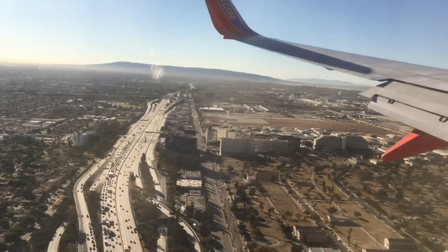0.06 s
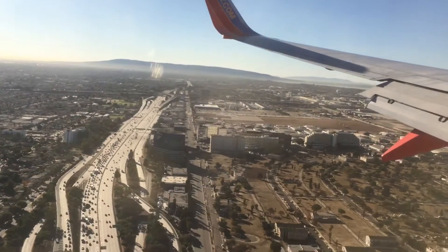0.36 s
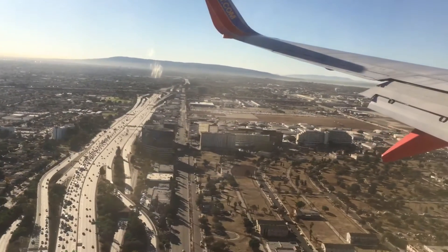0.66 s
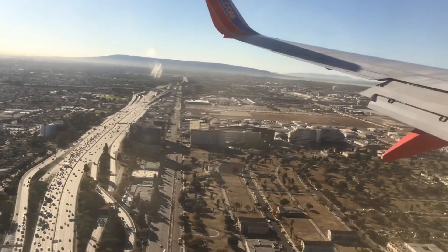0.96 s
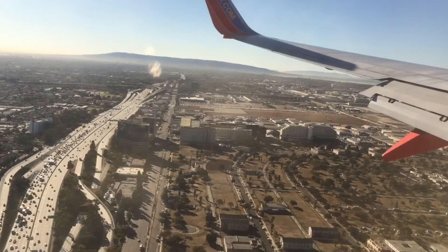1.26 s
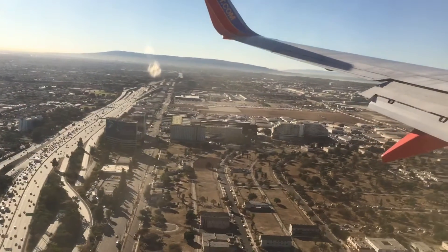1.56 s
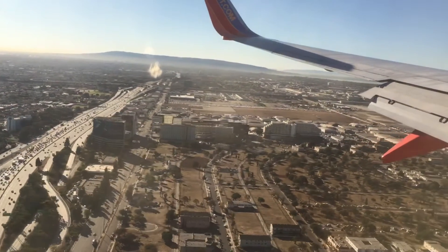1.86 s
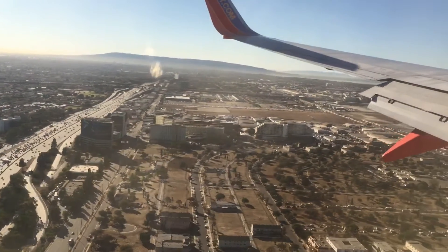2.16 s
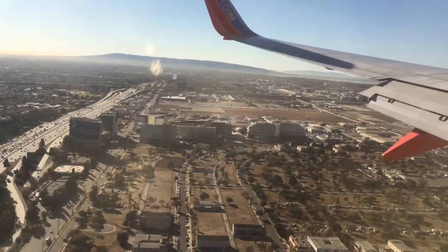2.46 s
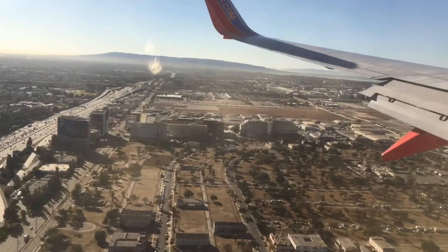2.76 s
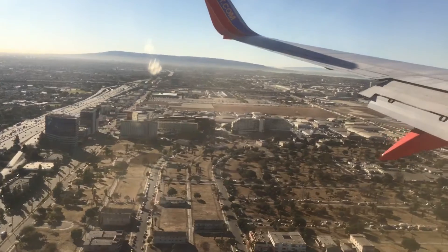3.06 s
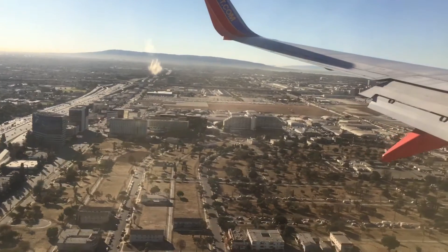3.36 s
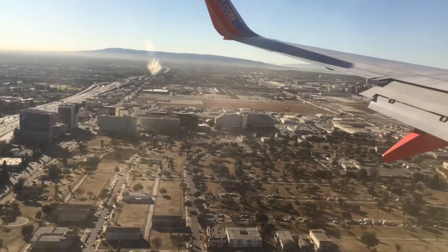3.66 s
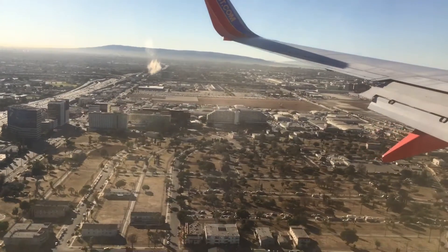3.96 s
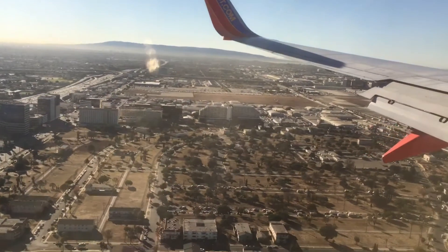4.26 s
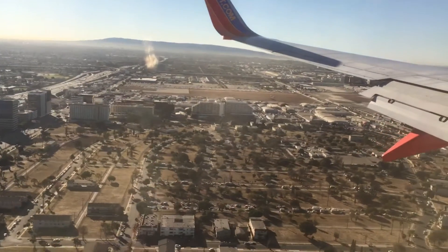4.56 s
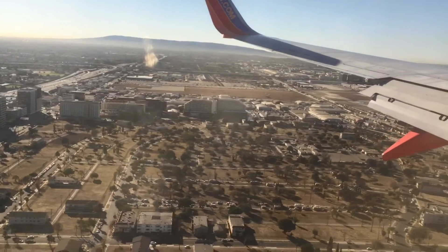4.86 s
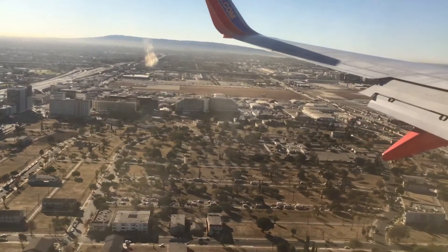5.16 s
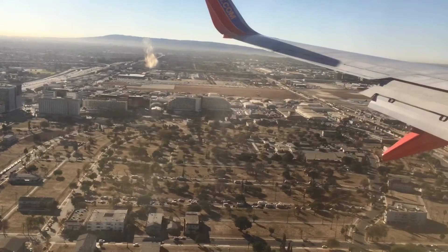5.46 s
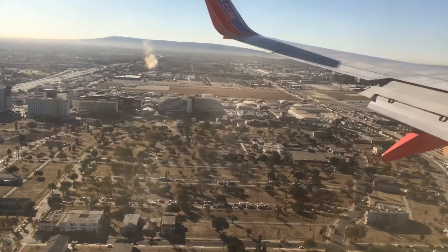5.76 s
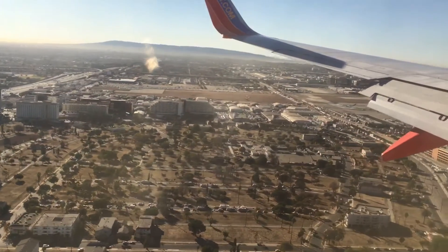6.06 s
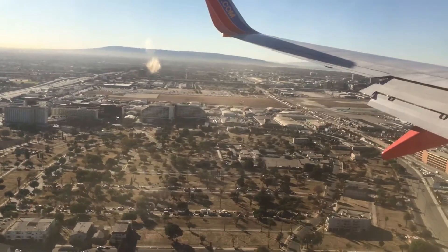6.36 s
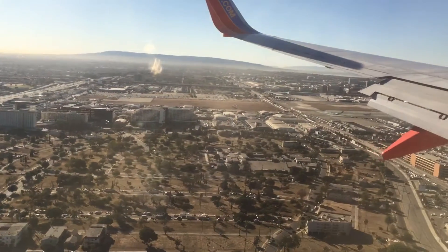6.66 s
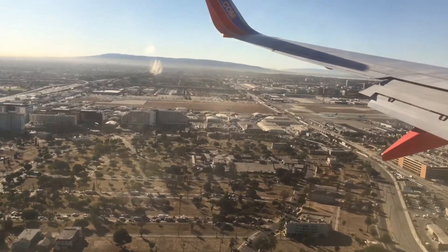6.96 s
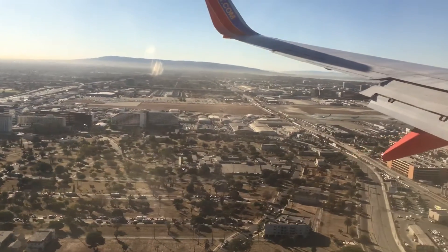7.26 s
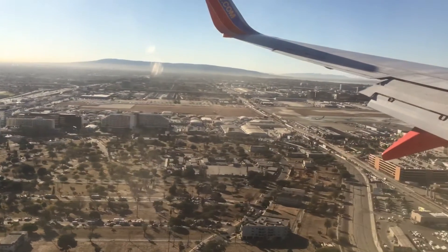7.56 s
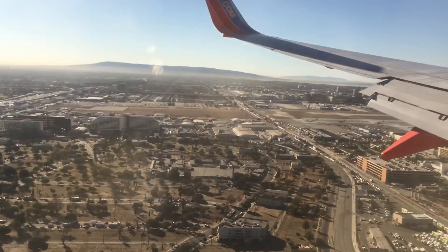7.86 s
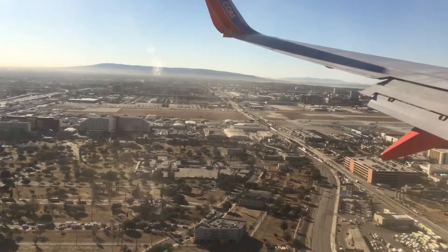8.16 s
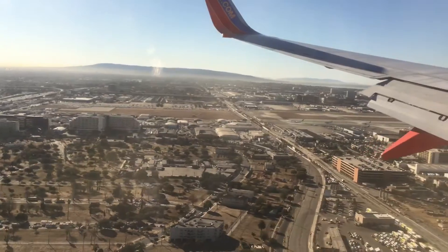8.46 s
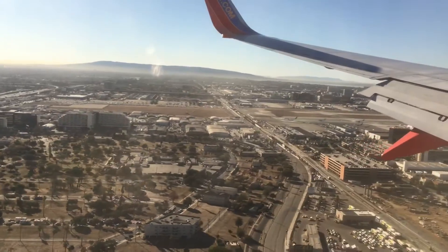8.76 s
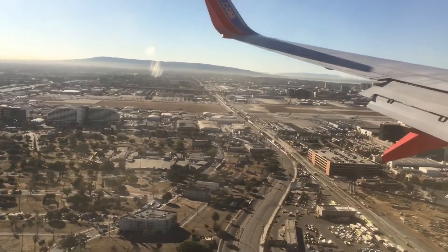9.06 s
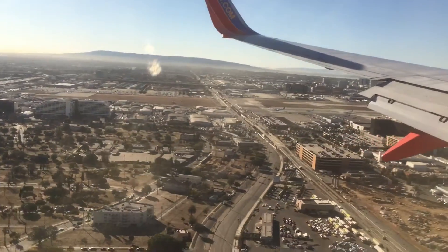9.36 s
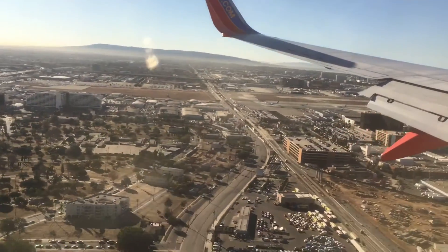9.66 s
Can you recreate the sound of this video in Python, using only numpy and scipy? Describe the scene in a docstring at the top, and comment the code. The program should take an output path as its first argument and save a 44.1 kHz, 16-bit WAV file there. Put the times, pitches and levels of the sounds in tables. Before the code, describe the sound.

Steady low rumble of jet engines and rushing air, heard inside the cabin of a descending airliner.

```python
"""Engine rumble fills the cabin of a descending airliner, heard at a window seat by the wing.
Buffeting air makes the fuselage boom, and the lowered flaps add a dull roar; all three are
broadband noise filtered by the cabin's modes. Over them lies the even hiss of air along the skin
and from the vents, coloured by the resonances of the window recess and by nearby reflections."""
import sys
import numpy as np
from scipy import signal
from scipy.fft import rfft, irfft
from scipy.io import wavfile
from scipy.ndimage import uniform_filter1d

SR = 44100
rng = np.random.default_rng(int(sys.argv[2]) if len(sys.argv) > 2 else 0)


def inscribe(sig):
    """Save sig as 16-bit PCM at rate SR to the path in sys.argv[1].

    A 1-D sig is mono; a 2-D sig holds one channel per row.
    Samples are clipped to [-1, 1] before scaling.
    """
    pcm = np.round(np.clip(np.atleast_2d(sig).T, -1, 1) * 32767)
    wavfile.write(sys.argv[1], SR, pcm.astype(np.int16))


N = 437472
TIME = np.arange(N) / SR
HZ = np.fft.rfftfreq(N, 1 / SR)

# smooth source spectra, as relative spectral density: (f/Hz, level/dB)
ENGINE_SPECTRUM = [(10, -90), (30, -54), (55, -11), (70, -6), (82, 0.5), (130, -3.5), (180, -4),
                   (225, -7.5), (265, -8.5), (300, -20), (380, -42), (1500, -140)]
BOOM_SPECTRUM = [(3, -35), (18, -30), (25, -19), (32, -27), (38, -4), (45, 0), (60, -1.5), (70, -3),
                 (85, -16.5), (130, -65), (300, -140)]
FLAP_SPECTRUM = [(150, -30), (250, -8), (285, 2.5), (340, 1), (375, -3), (405, -7.5), (460, -13),
                 (500, -20.5), (600, -24.5), (750, -32.5), (3000, -120)]
HISS_SPECTRUM = [(100, -30), (500, 3.5), (620, 2.5), (780, -2), (1500, 0), (2300, -5), (3200, -5.5),
                 (4000, -7.5), (5000, -13.5), (6300, -13.5), (7500, -19), (10000, -18.5), (13000, -19),
                 (15700, -25.5)]
# resonances and dips of the cabin air and wall panels: (f/Hz, width/Hz, gain/dB)
CABIN_RESONANCES = [(52.5, 17.5, 7), (97.5, 12.8, 4.5), (109.8, 16, 1.5), (131, 13, -2), (154.4, 24.7, 4.5),
                    (192.7, 23, 3), (240.7, 41.4, 4), (331, 16, 4), (357.5, 34, 5), (400, 7.7, 3),
                    (418, 16, -2), (442.7, 30, 7.5), (476, 14, 0.5), (520, 12, 3.5), (526, 16.6, 7.5)]
# resonances and dips of the wall trim and window recess: (f/Hz, width/Hz, gain/dB)
RECESS_RESONANCES = [(686, 30, 3.5), (856, 81, 3), (1066, 28, 3.5), (1118, 99, 3.5), (1290, 33, 4),
                     (1390, 49, 1.7), (1626, 76, 2.2), (1790, 190, -3), (2045, 320, 6), (2420, 180, 3),
                     (2780, 100, 3), (2960, 190, -2), (3220, 220, 2.5), (3420, 129, 2.5), (3890, 220, 3),
                     (4480, 135, 2.5), (4938, 233, -1.7), (5296, 498, 2), (6550, 258, 3), (7660, 337, -1.5),
                     (8166, 211, 2.6), (8600, 335, 4), (9377, 147, 3), (9822, 178, 3), (10290, 520, -6.5),
                     (11500, 280, 4.5), (12595, 289, -3), (13785, 535, 2), (14274, 270, -2.5),
                     (14723, 376, 4)]
# turbulence relative to calm air; rougher at first, calm, then rougher again: (t/s, level/dB)
TURBULENCE_LEVEL = [(0, 1.5), (1.9, 1), (3.0, 0.06), (5.5, 0), (7.9, 0), (8.5, 1.0), (9.92, 1.4)]
# peaks of the boom's strongest surges: (t/s, gain/dB)
BOOM_SURGES = [(.06, 3.5), (1.52, 4), (2.35, 3.5), (4.78, 4.5), (5.72, 4.5), (6.47, 5.5)]
# envelope of the flap roar, which swells gently twice: (t/s, level/dB)
FLAP_ENVELOPE = [(0, -29), (3.2, -29.5), (4.8, -28), (7.2, -30), (8.7, -28), (9.92, -28.1)]
# envelope of the hiss, nearly steady: (t/s, level/dB)
HISS_ENVELOPE = [(0, -41.5), (3.2, -42), (4.3, -41.5), (5.6, -41.5), (6.6, -41.5), (9.92, -41.5)]


def engine_rumble(turbulence_db, calm_db=-18.5, db_per_db=0.85):
    """Forced vibration: engine noise drives the cabin's modes, louder in rougher air."""
    rumble = steadied(coloured_noise(ENGINE_SPECTRUM, CABIN_RESONANCES), window_samples=30000)
    return rumble * gain_of(calm_db + db_per_db * turbulence_db)


def fuselage_boom(turbulence_db, calm_db=-20, db_per_db=1.4):
    """Buffeting: fluctuating pressure on the fuselage excites the lowest modes, with brief surges."""
    boom = steadied(coloured_noise(BOOM_SPECTRUM, CABIN_RESONANCES), window_samples=26000)
    surge_db = sum(lift_db * hump(peak_s, width_s=0.2) for peak_s, lift_db in BOOM_SURGES)
    return boom * gain_of(calm_db + db_per_db * turbulence_db + surge_db)


def flap_roar():
    """Flow noise: turbulence at the lowered flaps is heard through the cabin's resonances."""
    roar = steadied(coloured_noise(FLAP_SPECTRUM, CABIN_RESONANCES), window_samples=40000)
    return roar * gain_of(follow(FLAP_ENVELOPE))


def air_hiss(treble_hz=2500, swell_db=1.7):
    """Flow noise of skin and vents, filtered by the recess's resonances; its treble swells once."""
    hiss = near_reflections(coloured_noise(HISS_SPECTRUM, RECESS_RESONANCES))
    treble = irfft(rfft(hiss) * HZ ** 2 / (HZ ** 2 + treble_hz ** 2), N)
    treble_gain = gain_of(swell_db * hump(peak_s=4.08, width_s=0.61))
    return (hiss + treble * (treble_gain - 1)) * gain_of(follow(HISS_ENVELOPE))


def near_reflections(sound, echo_db=-17, earliest_s=.002, latest_s=.012, count=12):
    """Interference: weak echoes from window, wall and seat backs comb the spectrum finely."""
    delays_s, polarities = rng.uniform((earliest_s, -1), (latest_s, 1), (count, 2)).T
    echoes = sum(np.sign(polarity) * np.roll(sound, int(delay_s * SR))
                 for delay_s, polarity in zip(delays_s, polarities))
    mix = sound + gain_of(echo_db) * echoes / echoes.std()
    return mix / mix.std()


def coloured_noise(spectrum, resonances):
    """Source and filter: noise of rms 1 with a smooth spectrum and a peak or dip at each resonance."""
    hz, db = np.transpose(spectrum)
    colour_db = np.interp(np.log(HZ + 1), np.log(hz + 1), db)
    for centre_hz, width_hz, lift_db in resonances:
        colour_db += lift_db * .5 ** ((2 * (HZ - centre_hz) / width_hz) ** 2)
    noise = irfft(rfft(rng.standard_normal(N)) * gain_of(colour_db), N)
    return noise / noise.std()


def steadied(noise, window_samples):
    """Division by the running rms removes slow drifts of level and keeps the quick flutter."""
    window = np.hanning(window_samples)
    weight = signal.fftconvolve(np.ones(N), window, "same")
    power = signal.fftconvolve(noise ** 2, window, "same") / weight
    return noise / np.sqrt(power)


def follow(curve):
    """Linear interpolation to every sample; a moving average rounds the corners."""
    return uniform_filter1d(np.interp(TIME, *np.transpose(curve)), size=1500, mode="nearest")


def hump(peak_s, width_s):
    """Gaussian pulse of height 1, width_s wide at half height."""
    return .5 ** ((2 * (TIME - peak_s) / width_s) ** 2)


def gain_of(db):
    """Amplitude ratio of a level in decibels."""
    return 10 ** (np.asarray(db) / 20)


def scene():
    """Superposition of four independent noises at the seat; boom and rumble follow the turbulence."""
    turbulence_db = follow(TURBULENCE_LEVEL)
    buffeted = fuselage_boom(turbulence_db) + engine_rumble(turbulence_db)
    return (buffeted + flap_roar() + air_hiss())[None]


def record(dry):
    """Band limiting: a steep low-pass removes the highest treble; both ends fade briefly."""
    low_pass = signal.firwin(1023, cutoff=15720, window=("kaiser", 9), fs=SR)
    fades = signal.windows.tukey(N, .0004)
    return signal.oaconvolve(dry * fades, low_pass[None], "same")


dry = scene()
out = record(dry)
inscribe(out)
```